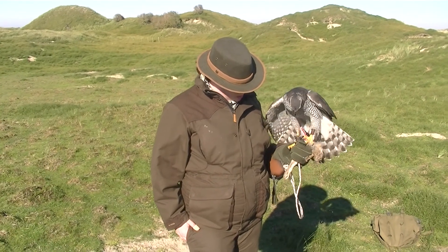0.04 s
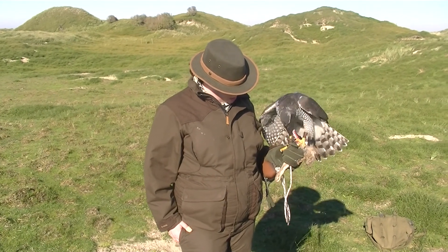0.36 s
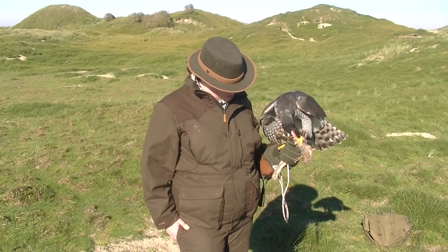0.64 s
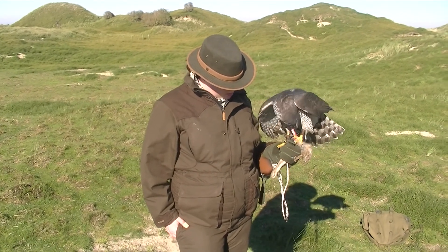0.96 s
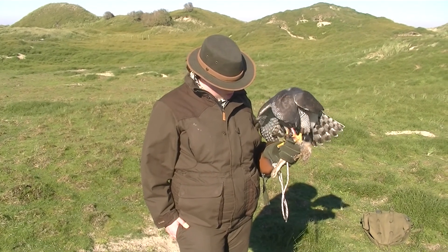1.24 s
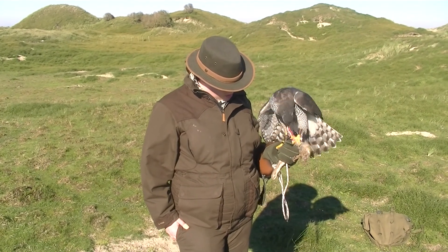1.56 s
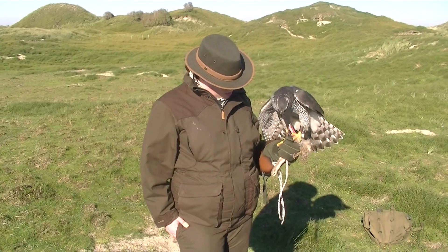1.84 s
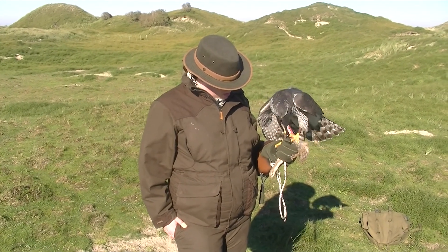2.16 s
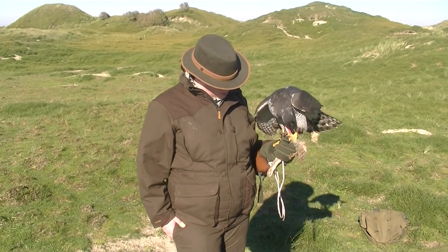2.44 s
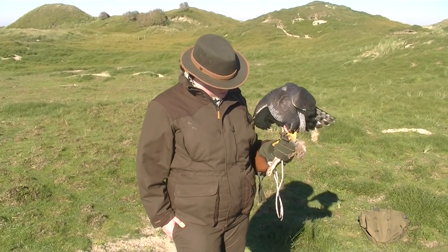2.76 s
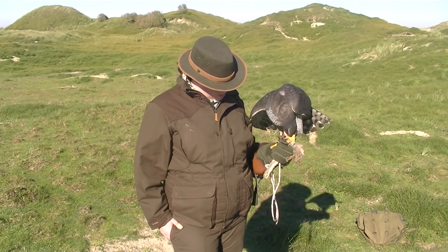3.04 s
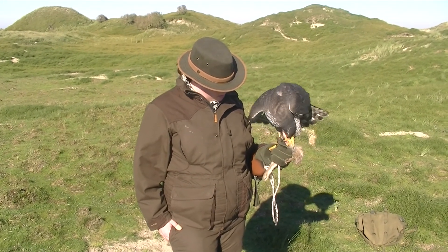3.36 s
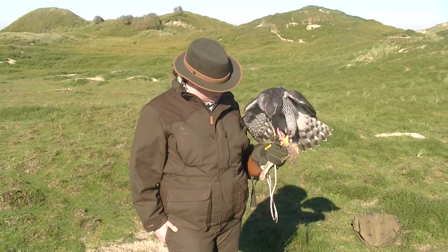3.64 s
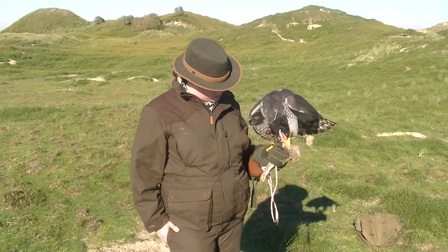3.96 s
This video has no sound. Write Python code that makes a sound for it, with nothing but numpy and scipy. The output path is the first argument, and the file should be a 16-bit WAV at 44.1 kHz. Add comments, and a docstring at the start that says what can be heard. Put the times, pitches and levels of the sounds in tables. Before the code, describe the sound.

Wind buffets the microphone throughout in low, uneven gusts, with overloaded thumps around 0.8, 1.1, 2.7 and 3.8 seconds and brief lulls near 2.4 and 3.1. Close by but much quieter, a hawk shifts on a leather glove with scattered talon ticks, tiny scrapes and very faint feather rustles. Its small bell jingles faintly at 1.6 seconds and more clearly at 3.6. A soft hush of air lies behind.

```python
"""Belled hawk in windy dunes

Close to the microphone a hawk shifts on a gloved hand: its small bell jingles twice as a loose pellet
strikes the shell, feathers brush, talons tick and scrape. Gusts buffet the stereo microphone, pushing
its channels mostly in opposite directions; the hardest slam it into overload.
Farther off lies a faint, steady hush of air over grass."""
import sys
import numpy as np
from scipy.fft import rfft, irfft, next_fast_len
from scipy.io import wavfile
from scipy.ndimage import uniform_filter1d, map_coordinates

SR = 44100
rng = np.random.default_rng(int(sys.argv[2]) if len(sys.argv) > 2 else 0)


def master_out(mix):
    """Clip the mix to full scale and print it as 16-bit PCM to the path in sys.argv[1]."""
    frames = np.transpose(np.atleast_2d(mix))
    ceiling = np.clip(frames, -1, 1)
    pcm = np.round(ceiling * 32767).astype(np.int16)
    wavfile.write(sys.argv[1], SR, pcm)


N = 176400


def amp(db):
    """Decibels to gain."""
    return 10 ** (np.asarray(db) / 20)


def unit(x):
    """Scaled to rms 1."""
    return x / np.sqrt(np.mean(x ** 2) + 1e-20)


def along(points, hz):
    """(Hz, value) points read on a log frequency axis."""
    point_hz, values = np.transpose(points)
    return np.interp(np.log(hz + 1), np.log(point_hz + 1), values)


def wobble(per_s):
    """A smooth random curve through per_s knots a second."""
    return map_coordinates(rng.standard_normal(4000), [np.arange(N) * per_s / SR], mode="mirror")


def filtered(x, response):
    """x shaped by a gain that depends on frequency."""
    size = next_fast_len(N + SR // 2)
    return irfft(rfft(x, size) * response(np.fft.rfftfreq(size, 1 / SR)), size)[..., :N]


def noise(spectrum):
    """Coloured mono noise of rms 1."""
    return unit(filtered(rng.standard_normal(N), lambda hz: amp(along(spectrum, hz))))


def stereo_noise(spectrum, likeness):
    """Coloured noise of rms 1; likeness holds (Hz, left-right correlation) points."""
    def mid_side_gains(hz):
        angle = np.arccos(np.clip(along(likeness, hz), -1, 1)) / 2
        return amp(along(spectrum, hz)) * [np.cos(angle), np.sin(angle)]
    mid, side = filtered(rng.standard_normal((2, N)), mid_side_gains)
    return unit(np.array([mid + side, mid - side]))


def steady(x, samples):
    """Noise with its chance swells smoothed out."""
    power = uniform_filter1d(uniform_filter1d(x * x, samples), samples)
    return x / np.sqrt(np.abs(power) + 1e-6)


def add(out, start_s, sound):
    """Mix a sound in from start_s on."""
    part = out[..., round(start_s * SR):][..., :sound.shape[-1]]
    part += sound[..., :part.shape[-1]]


def rubs(rows):
    """The grainy envelope of short rubs, each a smooth rise and fall."""
    t = np.arange(N) / SR
    swells = sum(amp(db) * np.exp(-((t - peak_s) / half_s) ** 2 / 2) for peak_s, half_s, db in rows)
    return swells * amp(1.47 * wobble(per_s=250))


def hawk_bell():
    """A pellet rings the shell, differently at each spot, and rolls on it; feathers damp the ring."""
    # The shell's modes. Each row: pitch in Hz, relative level in dB, free 60 dB ring time in seconds.
    modes = [(3420, -24, .09), (3562, -19, .16), (3670, -21, .1), (3756, -13, .14), (3820, 0, .17),
             (3851, -4, .14), (3984, -17, .1), (5875, -37, .2), (6650, -37, .2), (8335, -11, .28),
             (8550, -20, .16), (12700, -42, .15), (13970, -22, .19), (15740, -33, .2)]
    # The pellet's strikes. Each row: start in seconds, level in dB, share of the free ring time,
    # lift of the lowest modes in dB, lift of the upper modes in dB.
    strikes = [(1.623, -47, 0.12, 8, 12), (1.632, -53, 0.37, 17, 16.5), (1.646, -54, 0.34, 7, 11),
               (1.664, -51, 0.21, 22, 10.5), (1.673, -60, .35, 24, -9), (1.796, -54, 0.23, 0, 7.5),
               (1.81, -56.5, .25, 0, -1), (1.915, -52, 0.082, 16, 7), (1.933, -59, .14, 18, -2),
               (3.56, -53, .12, 0, -8), (3.576, -51, .12, 0, 3), (3.596, -52, 0.11, 3, -4),
               (3.61, -53, 0.73, 4, -2), (3.6357, -33, 0.7, -10, -2), (3.652, -37.5, 0.64, 13, 1),
               (3.6672, -39.5, 1, 10, 9), (3.7205, -43.5, 1, 17, -1), (3.754, -45, 0.54, 14, 6),
               (3.772, -47.5, 0.65, 13, 6), (3.789, -55, 0.46, 5, 12.5), (3.805, -50, 0.21, -9, 8),
               (3.833, -51, 0.13, 5, -10)]
    attack_s, pitch_scatter = 0.00062, 0.0028
    click_db, click_t60 = -20, 0.006
    out, t = np.zeros((2, N)), np.arange(SR // 3) / SR
    hz, mode_db, t60 = np.transpose(modes)[:, :, None]
    lowest, upper = hz < 3700, hz > 5000
    for start_s, db, ring_share, low_db, upper_db in strikes:
        scatter, offset, skew, detune = rng.standard_normal((4, len(modes), 1))
        start_db = db + mode_db + lowest * low_db + upper * upper_db + 0.93 * scatter
        envelope = amp(start_db - 60 * t / (t60 * ring_share)) * (1 - np.exp(-t / attack_s))
        phase = 2 * np.pi * hz * (1 + pitch_scatter * detune) * t + 0.76 * offset
        ring = np.array([(envelope * np.sin(phase + side * 0.3 * skew)).sum(0) for side in (1, -1)])
        click = amp(db + click_db - 60 * t / click_t60) * rng.standard_normal((2, len(t)))
        add(out, start_s, ring + click)
    rolling = 1 + 0.083 * wobble(per_s=150)
    return out * rolling * amp([[-2.5], [0.5]])  # a little to the right


def talon_ticks():
    """Talons and beak tick dryly on the glove, with tiny rustles between the larger moves."""
    # Taps on the glove. Each row: start in seconds, level in dB, time to fade 60 dB in seconds.
    taps = [(0.85, -48, 0.016), (1.063, -40.5, 0.01), (1.565, -56, 0.043), (1.6305, -37.5, 0.013),
            (1.956, -45.5, 0.01), (2.169, -56, 0.02), (2.8564, -40, 0.013), (2.917, -54, 0.012),
            (3.12, -53, .025), (3.3453, -48.5, .01), (3.4836, -43, 0.018), (3.5535, -53, 0.0097),
            (3.564, -41, 0.011), (3.5696, -33, 0.0057), (3.588, -40.5, 0.014), (3.652, -51, .02)]
    # A tick's spectrum. Each row: frequency in Hz, relative density in dB.
    spectrum = [(500, -25), (3000, 5), (6000, -3.5), (9000, 3.5), (12000, 0), (16000, 0)]
    attack_s = 0.00035
    envelope, t = np.zeros(N), np.arange(SR // 10) / SR
    for start_s, db, t60 in taps:
        add(envelope, start_s, amp(db - 60 * t / t60) * (1 - np.exp(-t / attack_s)))
    fidget = amp(-76 + 3.5 * wobble(per_s=14) + 4 * wobble(per_s=160))
    return (envelope + fidget) * stereo_noise(spectrum, likeness=[(8000, 0.37)])


def feather_brushes():
    """Feathers rub in soft, high whispers as the hawk shifts."""
    # Feather strokes. Each row: peak time in seconds, half length in seconds, level in dB.
    brushes = [(0.494, 0.017, -66), (0.537, 0.011, -60), (.68, 0.071, -68), (1.0, 0.025, -72),
               (1.71, 0.014, -64), (1.898, 0.009, -66), (2.075, .03, -70), (3.57, 0.18, -72),
               (3.668, 0.042, -65)]
    # The spectrum of rubbing feathers. Each row: frequency in Hz, relative density in dB.
    spectrum = [(1000, -32), (5000, -3), (9000, -1), (12000, 1.5), (16000, -8)]
    return rubs(brushes) * stereo_noise(spectrum, likeness=[(8000, 0.29)])


def glove_scrapes():
    """Short, raspy scrapes on the leather, dead centre."""
    # The scrapes. Each row: peak time in seconds, half length in seconds, level in dB.
    scrapes = [(.2915, 0.0017, -39.5), (.3045, 0.003, -41), (2.757, 0.0091, -56), (2.8, 0.0056, -64)]
    # The spectrum of scraped leather. Each row: frequency in Hz, relative density in dB.
    spectrum = [(400, -15), (1000, 2), (1500, -4), (1850, 1), (2200, 4), (2600, -14), (3500, -11.5),
                (5000, -23.5), (12000, -36)]
    return rubs(scrapes) * noise(spectrum)


def wind_buffeting():
    """Gusts push the channels mostly in opposite directions; strong ones shed finer eddies."""
    # Wind pressure on the microphone. Each row: time in seconds, relative level in dB.
    gusts = [(0.0, -16.5), (0.01, -7), (0.115, -16.5), (0.15, -67), (0.184, -9), (0.22, -36), (0.253, -11),
             (0.371, -16), (0.384, -17.5), (0.435, -12.5), (0.447, -30), (0.559, -12.5), (0.574, -22),
             (0.609, -18.5), (0.673, -43), (0.738, -17), (0.768, -25), (0.796, -14), (0.853, -8.5),
             (0.883, -36.5), (0.893, -20), (1.029, -16.5), (1.072, -6), (1.115, -35), (1.165, -16),
             (1.205, -30.5), (1.25, -10), (1.342, -30), (1.382, -30), (1.401, -9.5), (1.447, -25.5),
             (1.475, -11.5), (1.534, -35), (1.558, -11.5), (1.596, -24.5), (1.612, -8.5), (1.655, -30),
             (1.669, -12), (1.71, -28), (1.843, -19), (1.881, -38), (1.901, -27), (1.946, -49),
             (2.007, -23), (2.035, -37), (2.052, -13.5), (2.08, -37.5), (2.125, -21.5), (2.145, -29.5),
             (2.219, -17.5), (2.275, -56), (2.355, -50), (2.37, -30.5), (2.439, -59), (2.509, -34),
             (2.549, -38), (2.626, -36), (2.641, -9), (2.67, -27.5), (2.734, -28), (2.792, -13.5),
             (2.802, -28), (2.862, -8.5), (2.908, -49), (2.927, -30.5), (2.978, -27), (3.048, -61),
             (3.193, -46), (3.268, -33), (3.283, -40), (3.299, -23), (3.357, -54), (3.384, -22.5),
             (3.402, -37), (3.42, -15.5), (3.449, -31.5), (3.465, -10.5), (3.612, -13.5), (3.637, -19.5),
             (3.68, -8.5), (3.749, -19), (3.809, -7.5), (3.834, -26.5), (3.996, -12.5)]
    # Spectra of the opposing turbulence, the part both channels feel alike, and the finer eddies.
    # Each row: frequency in Hz, relative density in dB.
    opposed_spectrum = [(15, -49), (25, -27), (55, -10), (105, 2), (195, 2), (340, -14), (510, -25),
                        (850, -39), (1200, -52), (3000, -74), (8000, -100)]
    shared_spectrum = [(15, -30), (25, -30), (55, -9.5), (105, 3), (200, 2.5), (340, -8.5), (510, -19),
                       (850, -31.5), (1200, -45.5), (3000, -51.5), (8000, -100)]
    eddy_spectrum = [(40, 18), (150, 18), (300, 5), (600, -7), (1000, -26), (2000, -38), (5000, -48.5),
                     (12000, -91)]
    left_lean, strong_gust_db, eddy_growth = 0.084, -10, 1.51  # growth in eddy dB per gust dB
    gust_db = np.interp(np.arange(N) / SR, *np.transpose(gusts))
    push_pull = np.array([[left_lean + 1], [left_lean - 1]])
    opposed = amp(-1) * steady(noise(opposed_spectrum), samples=500) * push_pull
    shared = amp(-15) * steady(noise(shared_spectrum), samples=500)
    eddy_db = -30 + eddy_growth * (gust_db - strong_gust_db) + 3 * wobble(per_s=90)
    eddies = amp(eddy_db) * stereo_noise(eddy_spectrum, likeness=[(300, -0.59), (900, 0.4)])
    return amp(gust_db) * (opposed + shared) + eddies


def wind_slams():
    """Pressure swings with a steep front in the middle, where the microphone knocks and cracks."""
    # Pressure slams. Each row: time of the front in seconds, strength in dB, swing rate in Hz,
    # steepness of the front in Hz, left over right in dB, level of the hollow knock in dB.
    slams = [(.012, -9, 209, 400, 12, -36), (0.0783, -6.5, 207, 350, 3, -27),
             (0.259, -12, 214, 250, -1.5, -42), (0.3043, -8.5, 213, 506, 4.5, -21),
             (.358, -2.5, 251, 255, 3.5, -33.5), (0.7956, -5.5, 232, 920, 4.5, -16.5),
             (0.8153, -6, 221, 350, -0.5, -27), (0.847, 0, 243, 890, 1, -36), (.8488, 0, 216, 1350, 1, -13),
             (.896, -6, 313, 200, -4.5, -48), (0.973, -8, 244, 300, -4, -36),
             (1.044, -1.5, 192, 300, -2, -37), (1.0501, -5.5, 175, 500, -7, -26),
             (1.0668, -8.5, 200, 910, 5.5, -18.5), (1.07, -3.5, 241, 810, -3, -16),
             (1.252, -7.5, 200, 180, -7, -42), (1.56, -4, 241, 120, -4, -52),
             (1.6083, -4.5, 228, 505, 5, -27.5), (1.626, -10.5, 250, 400, 3, -30.5),
             (1.759, -11, 230, 200, -4, -44), (2.053, -7, 190, 120, -5.5, -66),
             (2.185, -14, 295, 201, -5, -44), (2.6484, -3, 257, 970, 4.5, -18.5),
             (2.8585, -13, 203, 600, 3.5, -25.5), (2.861, -4, 222, 830, 1, -16.5),
             (3.462, -8.5, 220, 300, 2.5, -34), (3.502, -3, 198, 400, 5, -34),
             (3.5399, -9.5, 213, 550, 9, -39), (3.549, -14, 207, 400, 5.5, -26),
             (3.68, -12, 200, 500, 1.5, -28.5), (3.795, -8.5, 171, 350, 5, -28.5),
             (3.8066, -1, 224, 1000, 1, -13), (3.903, -13, 219, 251, 6.5, -44)]
    fade_s, right_lag_s = 0.0049, 0.00003
    out, half = np.zeros((2, N)), SR // 50
    t = np.arange(-half, half) / SR - np.array([[0], [right_lag_s]])

    def blip(hz, narrowness):
        return np.real((1 - 2j * np.pi * hz * t / narrowness) ** -(narrowness + 1))
    knock = blip(hz=560, narrowness=2.88) + amp(-20) * blip(hz=3200, narrowness=3)  # thin crack on top
    for front_s, db, swing_hz, front_hz, pan_db, knock_db in slams:
        front = 2 / np.pi * np.arctan(2 * np.pi * front_hz * t)
        swing = front * np.exp(-np.abs(t) / fade_s) * np.cos(2 * np.pi * swing_hz * t)
        push_pull = np.array([[amp(db + pan_db / 2)], [-amp(db - pan_db / 2)]])
        add(out, front_s - half / SR, swing * push_pull + amp(knock_db) * knock)
    return out


def distant_air():
    """Air over the grass: a steady hush that swells slightly with the breeze."""
    # The spectrum of the hush. Each row: frequency in Hz, relative density in dB.
    spectrum = [(20, -43), (60, -2), (110, 2), (190, -4.5), (280, -2.5), (380, -7.5), (450, -10.5),
                (800, -18), (1500, -26), (1950, -27.5), (2300, -25), (2550, -31.5), (2725, -25.5),
                (2900, -30.5), (4000, -33.5), (6500, -39), (9200, -39.5), (12000, -44.5), (16000, -59)]
    # Its stereo spread. Each row: frequency in Hz, left-right correlation.
    likeness = [(60, 0.35), (130, -0.41), (290, 0.092), (640, -0.12), (1400, -0.51), (3100, -0.22),
                (15000, -0.14)]
    return amp(-44.5 + 0.2 * wobble(per_s=3.87)) * stereo_noise(spectrum, likeness)


def scene():
    """Wind right on the microphone, the hawk close by, the hush beyond."""
    wind = wind_buffeting() + wind_slams()
    hawk = hawk_bell() + talon_ticks() + feather_brushes() + glove_scrapes()
    return wind + hawk + distant_air()


def record(dry):
    """The microphone saturates on the slams; nothing is kept above the band limit."""
    ceiling, hardness, top_hz = 1.02, 7, 15900
    saturated = dry / (1 + np.abs(dry / ceiling) ** hardness) ** (1 / hardness)
    return filtered(saturated, lambda hz: hz < top_hz)


dry = scene()
out = record(dry)
master_out(out)
```